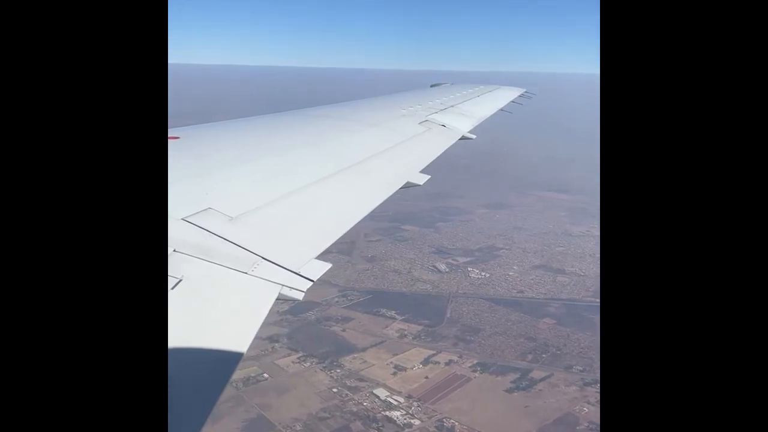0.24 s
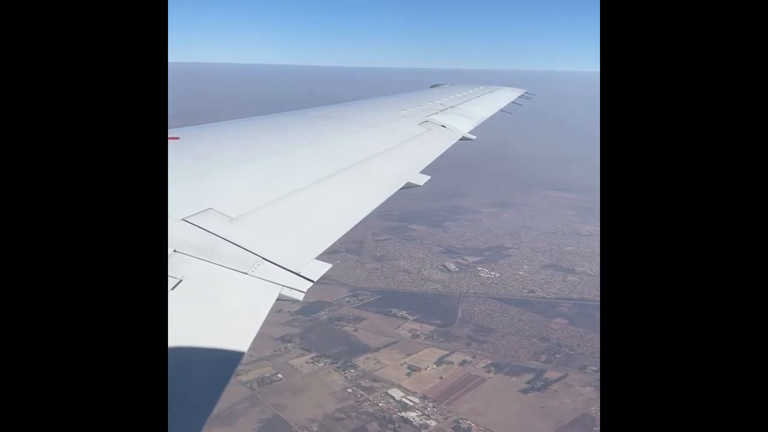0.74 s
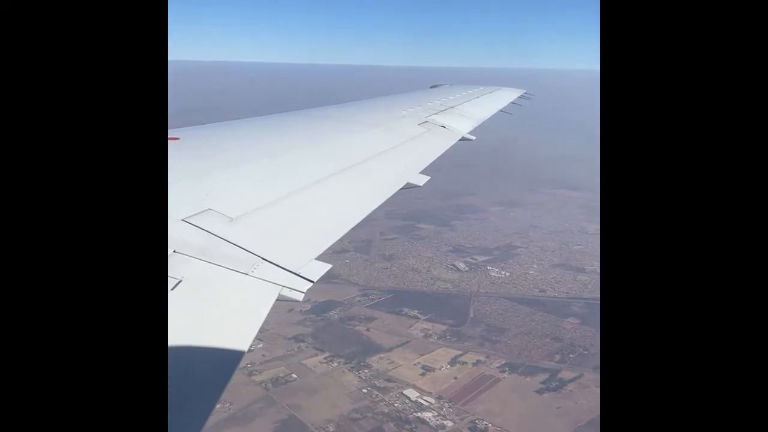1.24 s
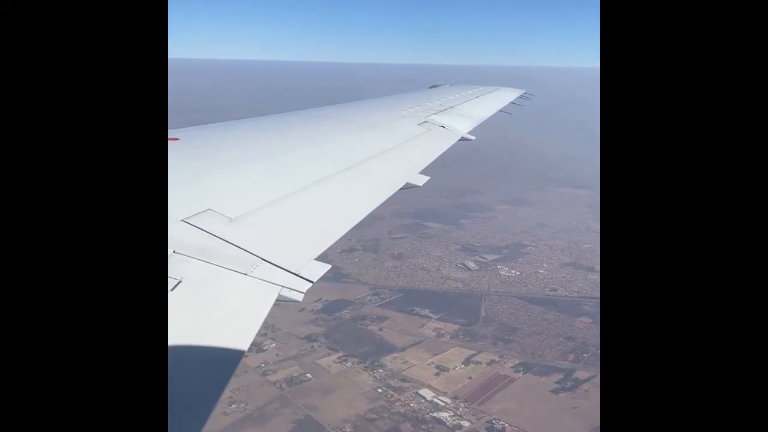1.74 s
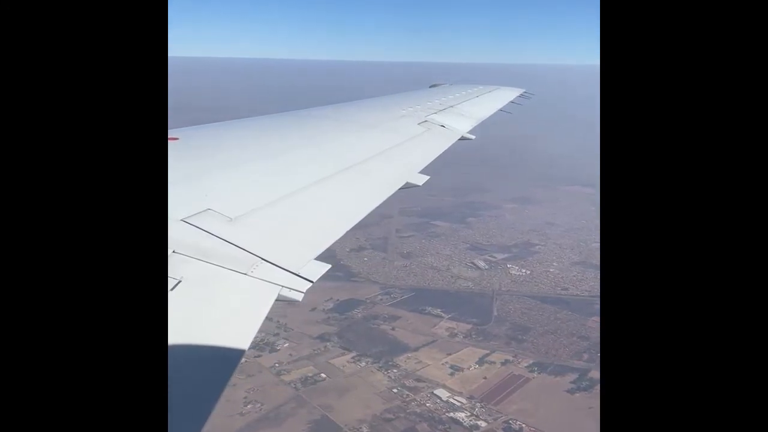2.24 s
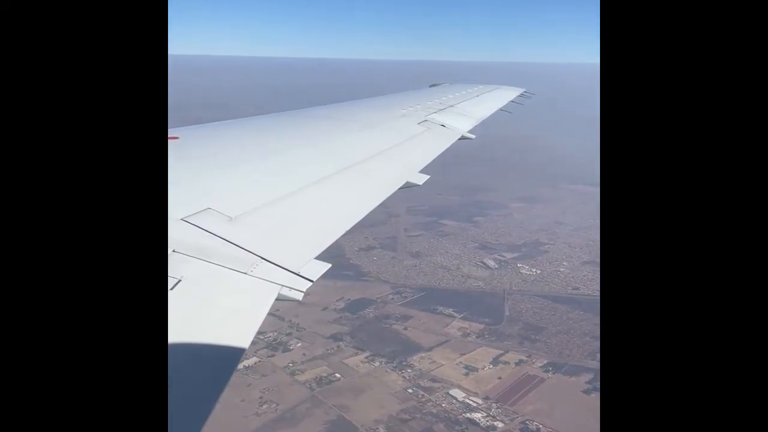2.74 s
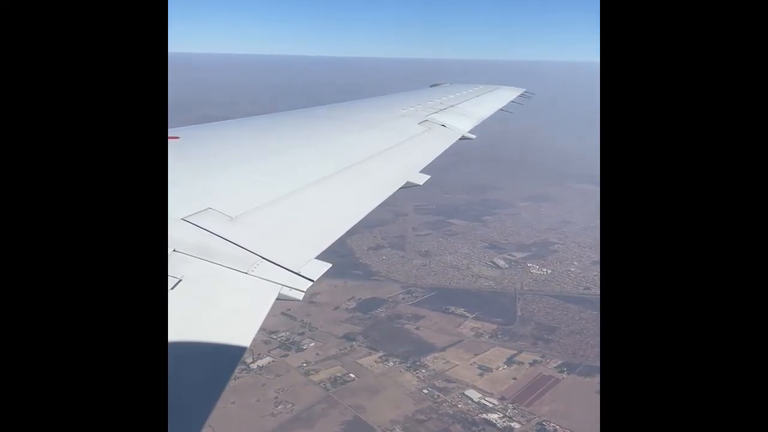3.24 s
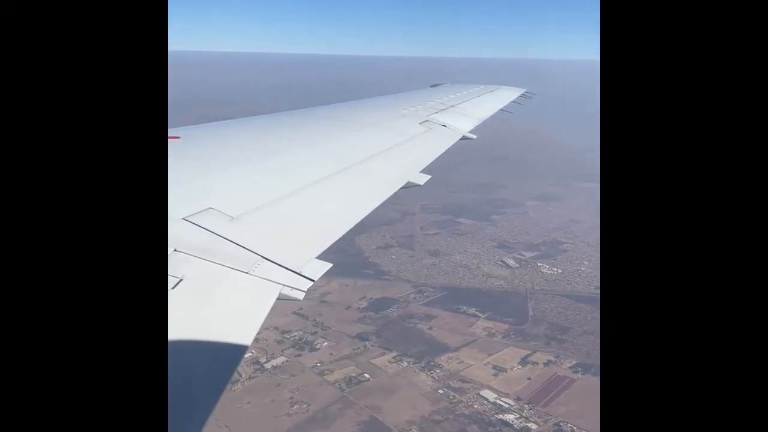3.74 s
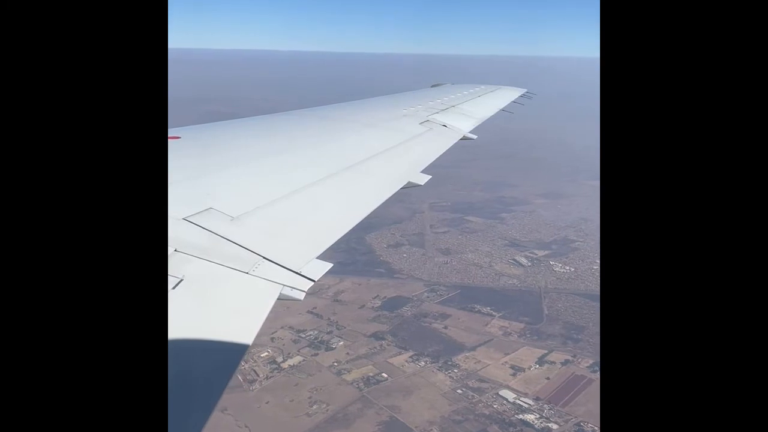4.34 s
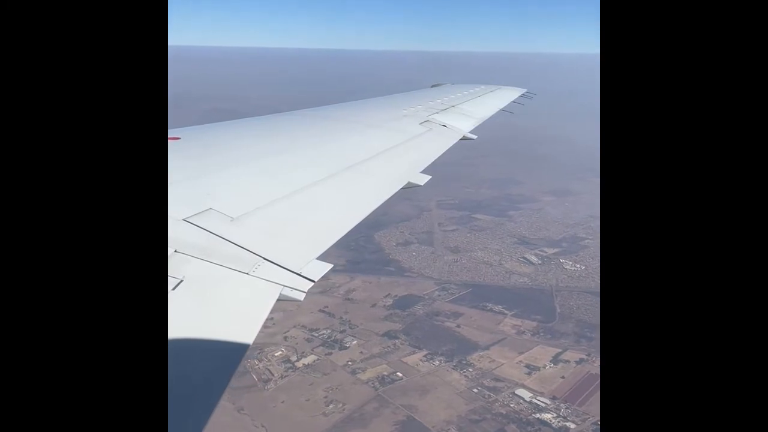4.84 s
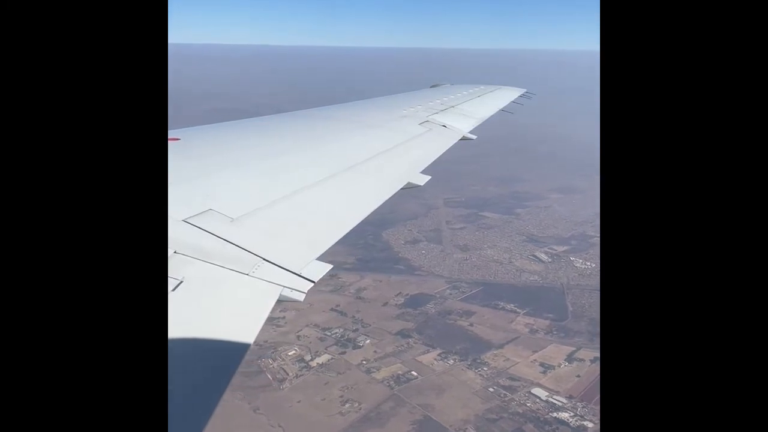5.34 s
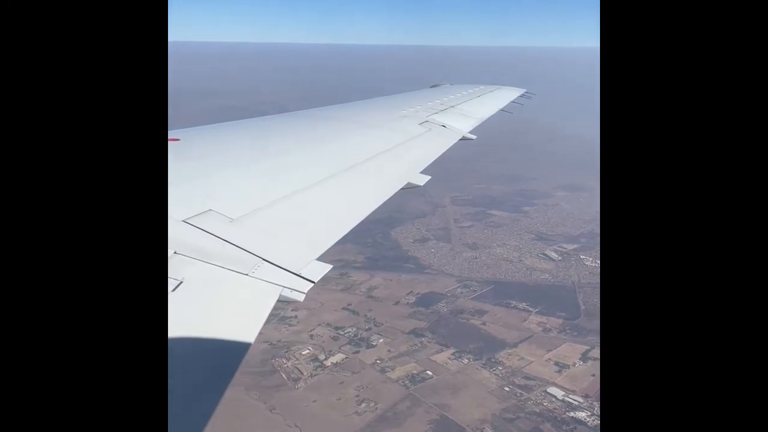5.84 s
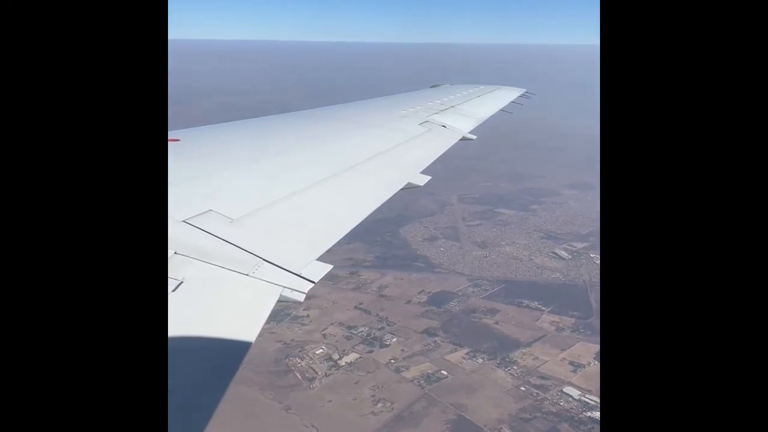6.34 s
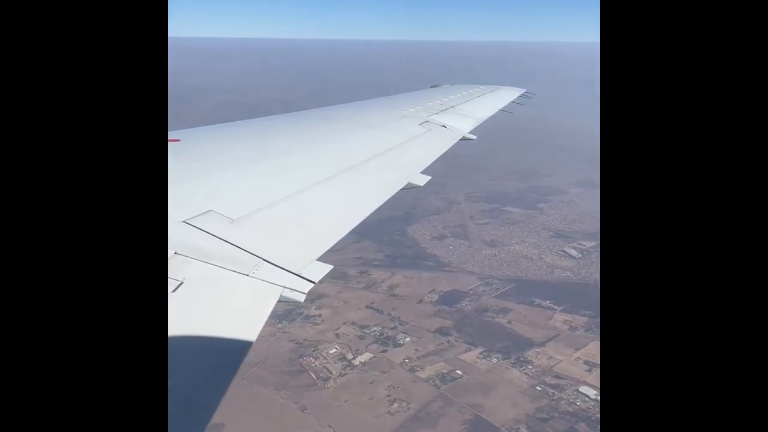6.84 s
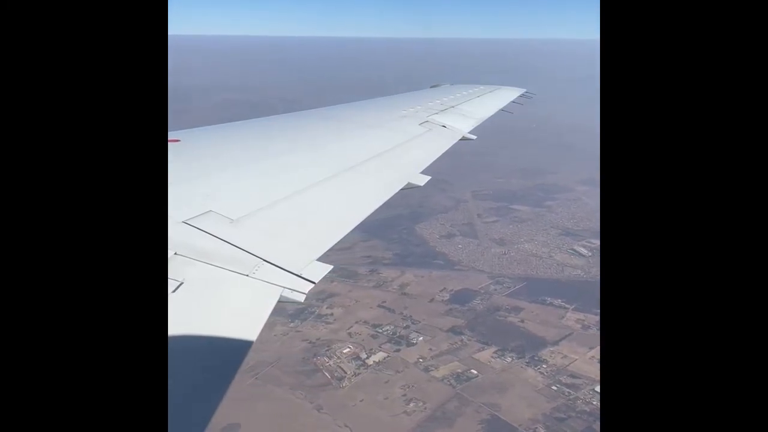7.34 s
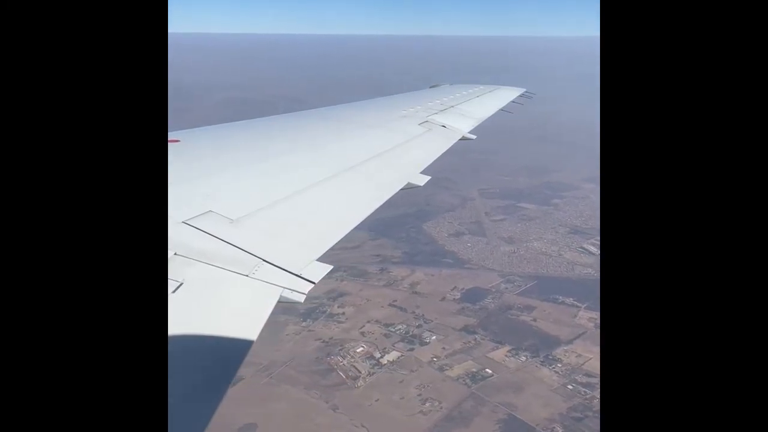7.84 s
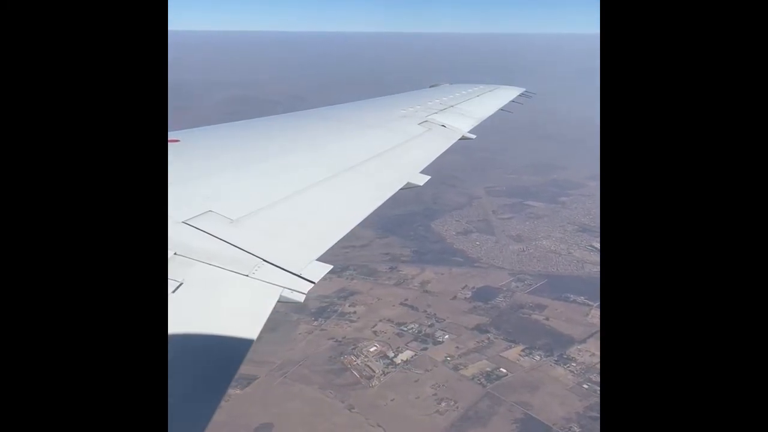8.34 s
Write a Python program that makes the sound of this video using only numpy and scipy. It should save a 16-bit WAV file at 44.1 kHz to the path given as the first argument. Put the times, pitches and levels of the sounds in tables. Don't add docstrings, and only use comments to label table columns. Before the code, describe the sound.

Steady deep jet cabin roar with a low engine hum and faint whine, plus small plastic latch snaps and one dull lid thud midway.

```python
import sys
import numpy as np
from scipy import signal
from scipy.fft import rfft, irfft, next_fast_len
from scipy.io import wavfile
from scipy.ndimage import uniform_filter1d, map_coordinates

SR = 44100
rng = np.random.default_rng(int(sys.argv[2]) if len(sys.argv) > 2 else 0)


def inscribe(sig):
    pcm = np.round(np.clip(np.atleast_2d(sig).T, -1, 1) * 32767)
    wavfile.write(sys.argv[1], SR, pcm.astype(np.int16))


def ratio(d):
    e = np.asarray(d, float) / 20
    return 10 ** e


N = 379701
SHAFT_HZ = 124.82

# frequency in Hz, left lead in rad.
PORT_LEAD = [(40, -.04), (125, -.12), (300, -.35), (650, -.7), (1000, -.1), (1300, -.4), (1600, -.2),
             (2600, 2.4), (3600, 2.1), (4300, .8), (5000, 1.3), (5900, 3.1), (6700, 4.4), (7000, 6.2)]


def unit(x):
    return x / np.sqrt(np.mean(x ** 2) + 1e-20)


def along(points, hz):
    point_hz, value = np.transpose(points)
    return np.interp(np.log(hz + 1), np.log(point_hz + 1), value)


def curves(rows):
    time_s, *columns = np.transpose(rows)
    return [np.interp(np.arange(N) / SR, time_s, column) for column in columns]


def wobble(rate):
    knots = rng.standard_normal(int(N * rate / SR) + 4)
    coarse = map_coordinates(knots, [np.arange(0, N + 64, 64) * rate / SR])
    return np.repeat(coarse.astype(np.float32), 64)[:N]


def filtered(x, response):
    size = next_fast_len(x.shape[-1] + 8192)
    spectrum = rfft(x, size) * response(np.fft.rfftfreq(size, 1 / SR))
    return irfft(spectrum, size)[..., :x.shape[-1]]


def ports(hz):
    # frequency in Hz, likeness of the ports from 0 to 1.
    alike = [(60, .998), (150, .99), (300, .93), (650, .62), (1200, .58), (1750, .87), (2300, .6),
             (3400, .5), (4200, .2), (4800, .25), (5700, .8), (6800, .65), (7300, 0), (15000, 0)]
    # frequency in Hz, left minus right level in dB.
    balance = [(60, -.4), (150, -.9), (450, -3.2), (700, -1.2), (1000, -3), (1250, -.6), (1500, -2.7),
               (2050, 1.2), (3300, 0), (4800, -2), (5700, 0), (15000, 0)]
    turn = np.arccos(np.clip(along(alike, hz), 0, 1)) / 2
    side = ratio(along(balance, hz) / 2) * np.exp(.5j * along(PORT_LEAD, hz))
    left = [side * np.cos(turn), side * np.sin(turn)]
    right = [np.cos(turn) / side, -np.sin(turn) / side]
    return np.array([left, right])


def rush(colour, patchy_db):
    z = signal.stft(rng.standard_normal((2, N)), nperseg=512)[2]
    patches = uniform_filter1d(rng.standard_normal(z.shape[1:]), size=5, axis=0)
    patches = uniform_filter1d(patches, size=12, axis=1)
    pair = signal.istft(z * ratio(patchy_db * unit(patches)), nperseg=512)[1][:, :N]
    out = filtered(pair, lambda hz: colour(hz) * ports(hz)).sum(axis=1)
    return out / np.std(out.mean(axis=0))


def airflow():
    # frequency in Hz, level in dB per Hz.
    roar_points = [(20, -56.5), (32, -35.5), (45, -18), (57, -2), (80, -6), (129, -4), (190, -6.5),
                   (280, -7.5), (443, -17.5), (620, -21), (1150, -36), (1500, -43.5), (1950, -73.5),
                   (3300, -120)]
    # frequency in Hz, width in Hz, level in dB.
    panels = [(62.6, 4.6, 2), (94, 6.1, 5), (156, 24, 0.5), (255, 4.6, 6.5), (1530, 67, -6), (2130, 54, 0)]
    # frequency in Hz, level in dB.
    hiss_points = [(900, -36), (1500, 5.5), (1900, 0), (2800, 1.5), (3900, -4), (5300, -1.5), (5750, 2),
                   (6300, -3), (7500, 3), (8300, -2.5), (9900, -2), (11000, -6.5), (13000, -4.5),
                   (15700, -9)]
    roar_db, hiss_db = -17.5, -50.5
    gust_db = 0.6 * wobble(1.5)

    def walls(hz):
        return ratio(sum(db / (1 + ((hz - c) / (w / 2)) ** 2) for c, w, db in panels))

    def hiss_colour(hz):
        return ratio(along(hiss_points, hz)) / (hz + 1) * walls(hz) * (hz > 800)

    roar = rush(lambda hz: ratio(along(roar_points, hz)) * walls(hz), patchy_db=-0.16)
    hiss = rush(hiss_colour, patchy_db=2.0)
    return ratio(roar_db + gust_db) * roar + ratio(hiss_db + gust_db + .4 * wobble(4.1)) * hiss


def shaft():
    hunt_s, hunt_top_s, hunt_per_mille, creep_per_mille_s = 1.15, 6.0, .3, .045
    t = np.arange(N) / SR
    hunt = hunt_per_mille * np.cos(2 * np.pi * (t - hunt_top_s) / hunt_s)
    creep = creep_per_mille_s * (t - t.mean())
    return SHAFT_HZ * (1 + (hunt + creep) / 1000)


def tones(turns, rows, sway_db):
    out = np.zeros((2, N))
    for order, left_db, right_db, lead_rad in rows:
        cycles = round(order) * turns + rng.random()
        phase = (2 * np.pi * (cycles - np.floor(cycles))).astype(np.float32)
        depth = np.float32(sway_db * min(order / 12, 1) * np.log(10) / 20)
        sway = np.exp(depth * wobble(1.5))
        out[0] += np.float32(np.sqrt(2) * ratio(left_db)) * sway * np.sin(phase + np.float32(lead_rad))
        out[1] += np.float32(np.sqrt(2) * ratio(right_db)) * sway * np.sin(phase)
    return out


def fan():
    # shaft order, left level in dB, right level in dB, left lead in rad.
    strong_rows = [(1, -19.6, -18.9, -0.1), (4, -36.0, -33.0, -0.8), (5, -45.0, -38.0, -1.1),
                   (6, -51.0, -41.0, -2.1), (10, -50.6, -56.0, -0.3), (11, -63.8, -54.2, 0.7),
                   (14, -52.7, -51.6, 0.2), (18, -64.7, -55.2, 1.4), (22, -52.8, -50.1, 2.1),
                   (23, -70.2, -65.9, 3.1), (24, -53.1, -57.8, -3.1), (25, -60.5, -64.3, 1.5),
                   (28, -70.6, -69.3, 2.2), (29, -72.2, -62.9, -3.0), (30, -73.9, -67.9, 2.7),
                   (31, -73.3, -69.5, 0.4), (35, -69.0, -69.6, 1.9), (36, -70.1, -64.0, 1.5),
                   (38, -69.1, -65.1, 0.4), (39, -77.0, -61.4, -2.5), (40, -67.7, -67.9, -1.5),
                   (41, -74.9, -72.5, 1.2), (45, -71.9, -69.8, 1.4), (48, -66.8, -63.2, -2.7),
                   (50, -74.8, -74.4, -2.8), (51, -71.3, -71.3, -2.4), (53, -72.7, -72.6, -2.1),
                   (55, -70.8, -71.3, -0.3), (56, -73.2, -73.1, -0.3), (58, -72.8, -72.9, -0.1)]
    # frequency in Hz, level in dB.
    faint_points = [(250, -39.5), (850, -55), (1050, -57), (1600, -75.5), (2400, -69), (4000, -74),
                    (7500, -93), (9800, -87.5)]
    strong = [round(row[0]) for row in strong_rows]
    others = np.array([k for k in range(2, 79) if k not in strong])
    chance = rng.standard_normal((len(others), 3))
    level_db = along(faint_points, others * SHAFT_HZ)
    left_db = level_db + 4.2 * chance[:, 0]
    right_db = level_db + 1.0 * chance[:, 1]
    lead_rad = along(PORT_LEAD, others * SHAFT_HZ) + .5 * chance[:, 2]
    faint_rows = np.transpose([others, left_db, right_db, lead_rad])
    return tones(np.cumsum(shaft()) / SR, list(strong_rows) + list(faint_rows), sway_db=1)


def pumps():
    # pump order, left level in dB, right level in dB, left lead in rad.
    pump_rows = [(1, -64.5, -57.1, 1.1), (2, -56.5, -55.4, 0.0), (3, -59.6, -57.7, 1.0),
                 (4, -70.2, -70.3, 2.6), (5, -61.2, -63.5, -0.1), (6, -72.7, -68.3, 1.1),
                 (7, -63.1, -63.6, -3.1)]
    follows = [0, -.7, 1.1, 0, .6, 0, 0]
    # time in seconds, shift in dB.
    field_rows = [(0, 2.5), (1.8, 2), (2.5, 3.5), (3.3, 1.5), (4.0, 4.5), (4.8, -1), (6.1, -4), (6.9, -3.5),
                  (8.61, -5)]
    gear_ratio, far_hz = 6.7795, 845.2
    flutter_db, flutter_rate = .4, 9
    near_turns = np.cumsum(shaft() * gear_ratio) / SR
    far_turns = np.cumsum(far_hz + .4 * wobble(2.5).astype(float)) / SR
    field_db = curves(field_rows)[0]
    out = 0
    for row, follow in zip(pump_rows, follows):
        near = ratio(-1) * tones(near_turns, [row], sway_db=1.5)
        far = ratio(-8.5) * tones(far_turns, [row], sway_db=5)
        level_db = follow * field_db + flutter_db * row[0] * wobble(flutter_rate)
        out = out + ratio(level_db) * (near + far)
    return out


def lids():
    # start in seconds, level in dB, frequency in Hz, T60 in seconds.
    thuds = [(5.520, -.5, 245, .062), (5.5242, -9.5, 470, .09), (5.5243, -15, 710, .08),
             (5.519, -21, 1560, .04), (5.527, -19, 1150, .05), (5.528, -23, 1600, .04),
             (5.526, -26, 2300, .04), (4.735, -18, 620, .06), (4.737, -24, 900, .06),
             (4.736, -25, 1520, .06), (4.735, -28, 2050, .05), (4.737, -31, 3300, .04),
             (7.256, -36, 3500, .04), (7.255, -32, 2680, .04), (4.166, -33, 1800, .05),
             (7.253, -27, 1500, .03), (7.254, -28, 2300, .04), (7.258, -26, 1200, .04),
             (7.268, -24, 980, .07), (7.646, -30, 1400, .04)]
    out, t = np.zeros(N + SR), np.arange(SR // 4) / SR
    for s, db, hz, t60_s in thuds:
        envelope = ratio(db - 60 * t / t60_s) * (1 - np.exp(-t * hz))
        out[round(s * SR):][:len(t)] -= envelope * np.sin(2 * np.pi * hz * t)
    return filtered(out[:N], lambda hz: ports(hz)[:, 0])


def latches():
    # start in seconds, peak in dB, knock in dB, fizz in dB, length in seconds.
    snaps = [(2.334, -36, -4, -27, .02), (2.66, -32.5, -7, -30, .025), (2.685, -33, -6, -30, .025),
             (4.158, -28.5, -6, -23, .027), (4.733, -17.5, 4, -34, 0.017), (4.81, -37, -3, -30, .03),
             (5.475, -28, -4, -18, 0.019), (5.497, -23, -3, -19, 0.02), (5.5178, -20.5, 7, -18, .013),
             (5.525, -20, -4, -21, .016), (7.252, -24, 5.5, -23.5, .016), (7.267, -30.5, 9, -28, .014),
             (7.642, -30, 9, -27, .02), (7.808, -33, 4, -29, .018)]
    # frequency in Hz, width in Hz, level in dB.
    plastic = [(496, 250, -0.5), (993, 230, 4), (1550, 350, 1.5), (2160, 470, -3), (3340, 1770, -11.5)]
    cabin_t60_s, rise_s = 0.42, 0.0018
    aisle_db = -2
    pan_db = np.array([[aisle_db / 2], [-aisle_db / 2]])
    out, t = np.zeros((2, N + SR)), np.arange(SR // 3) / SR
    rise = 1 - np.exp(-t / rise_s)

    def shell(f):
        total = 0
        for k, (c, w, db) in enumerate(plastic):
            total = total + (-1) ** k * ratio(db) * 1j * f * w / (c * c - f * f + 1j * f * w)
        return total

    def bright(f):
        return (f / 4000) ** 2 / (1 + (f / 4000) ** 2) / (1 + (f / 11000) ** 3)

    for s, db, knock_db, fizz_db, length_s in snaps:
        slips = 0.5 * rng.standard_normal(len(t)) + 0.66 * rng.standard_normal((2, len(t)))
        body_decay = np.exp(-(t / length_s) ** 2) + ratio(-12.0 - 60 * t / cabin_t60_s)
        fizz_decay = np.exp(-(1.8 * t / length_s) ** 2) + ratio(-14.5 - 60 * t / (0.5 * cabin_t60_s))

        def knock(f):
            return shell(f) * ratio(knock_db / (1 + (f / 1300) ** 6)) / (1 + (f / 5500) ** 4)

        body = filtered(rise * body_decay * slips, knock)
        fizz = filtered(rise * fizz_decay * slips, bright)
        snap = ratio(db + 6.5 + pan_db) * (body + ratio(fizz_db + 5.5) * fizz)
        out[:, round(s * SR):][:, :len(t)] += snap
    return out[:, :N]


def scene():
    return airflow() + fan() + pumps() + lids() + latches()


def treble_gaps(x):
    # lower edge in Hz, kept share of mid, kept share of side.
    kept = [(6080, .8, 1), (6250, 1, 1), (6930, .97, .22), (7400, .97, .95), (7550, .03, .03),
            (8250, .82, .3), (9000, 1, .015), (9950, .025, 0), (10500, .7, 0), (10800, .9, 0),
            (11900, .95, .6), (12100, .22, .1), (12700, .87, .05), (13500, .88, 0), (14000, .6, 0),
            (14250, .75, 0), (14500, .25, 0), (14750, .22, 0), (15000, .05, 0), (15300, .25, 0),
            (15550, .4, 0), (15800, 0, 0)]
    frame = dict(window=("tukey", .4), nperseg=1400, noverlap=280)
    hz, _, z = signal.stft([x[0] + x[1], x[0] - x[1]], SR, **frame)
    for (low_hz, *shares), (high_hz, *_) in zip(kept, kept[1:]):
        band = (hz >= low_hz) & (hz < high_hz)
        level_db = 10 * np.log10(np.mean(abs(z[:, band]) ** 2, axis=1) + 1e-20)
        need = .6 * level_db + 4 * rng.standard_normal(level_db.shape)
        limit = np.array([[np.quantile(row, 1 - share)] for row, share in zip(need, shares)])
        nudge = 1e-9 * (np.array(shares)[:, None] - .5)
        keep = need + nudge > limit
        z[:, band] *= keep[:, None]
    mid, side = signal.istft(z, SR, **frame)[1][:, :N]
    return np.array([mid + side, mid - side]) / 2


def roll_off(x):
    return signal.sosfilt(signal.butter(12, 15610, fs=SR, output="sos"), x)


def record(dry):
    ease = np.clip((N - np.arange(N)) / 40, 0, 1)
    mix = treble_gaps(dry) * ease
    return roll_off(mix)


dry = scene()
out = record(dry)
inscribe(out)
```